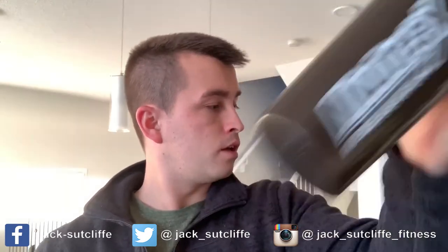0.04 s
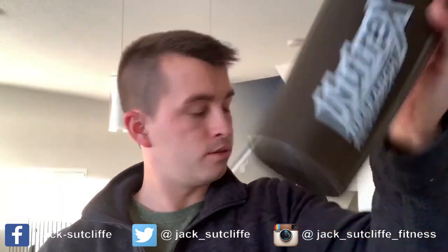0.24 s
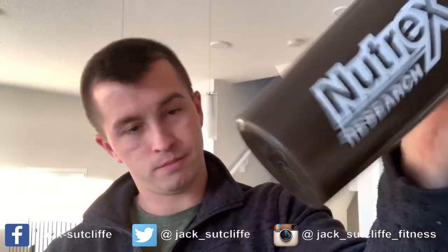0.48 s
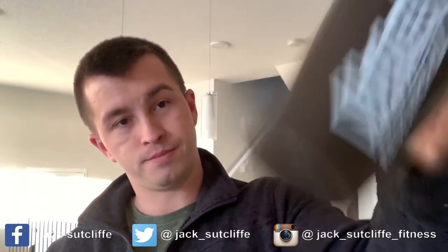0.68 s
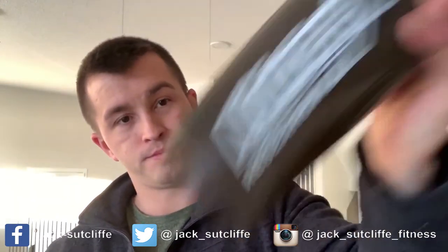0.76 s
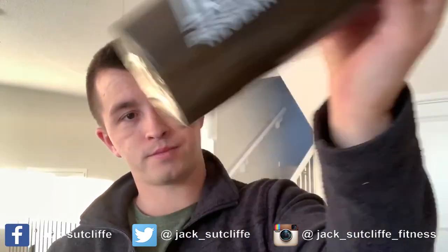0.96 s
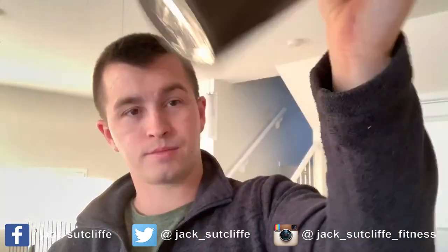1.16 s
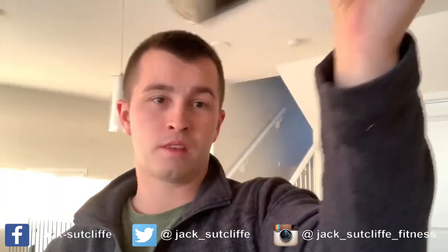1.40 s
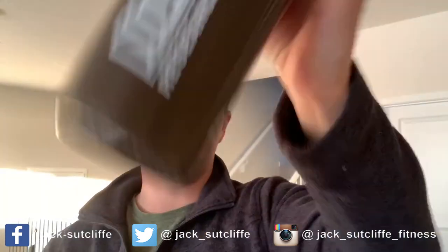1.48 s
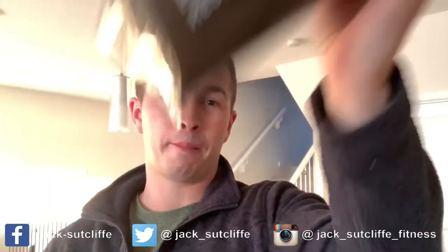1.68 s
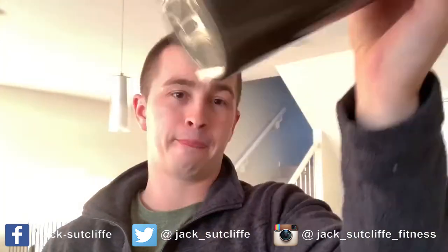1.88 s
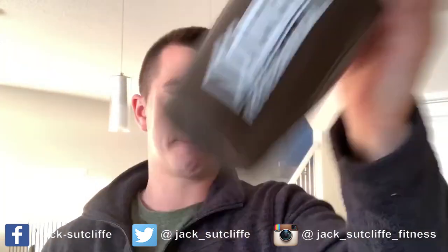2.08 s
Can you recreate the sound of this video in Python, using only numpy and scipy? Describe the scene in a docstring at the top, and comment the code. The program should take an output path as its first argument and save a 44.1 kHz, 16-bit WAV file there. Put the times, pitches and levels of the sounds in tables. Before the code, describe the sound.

A plastic shaker bottle of thick drink is shaken fast, close to the microphone in a quiet room; bubbly splashes and short falling glugs come first, then a loose part starts knocking on the plastic wall.

```python
"""A plastic shaker bottle, half full of thick drink, is shaken hard by hand, heard close by indoors in widened
stereo. From the start the drink splashes on lid and walls (clumped droplets and bubbles ringing in bands) over
quiet room noise. Soon it slaps the bottom with a falling glug (a gliding, foamy tone), and low thuds follow as
it lands (a short low sine). Later a loose part begins to knock on the plastic (ringing modes and a noise
crack); all go on almost to the end."""
import sys
import numpy as np
from scipy import signal
from scipy.fft import rfft, irfft, next_fast_len
from scipy.io import wavfile
from scipy.ndimage import uniform_filter1d

SR = 44100
rng = np.random.default_rng(int(sys.argv[2]) if len(sys.argv) > 2 else 0)


def invert_db(level):
    """Linear amplitude ratio for a level in decibels (20 dB per decade), elementwise."""
    return 10 ** (np.asarray(level, dtype=float) / 20)


def int16_out(signal):
    """Quantize to a 16-bit WAV file."""
    q = np.round(np.clip(np.atleast_2d(signal).T, -1, 1) * 32767)
    wavfile.write(sys.argv[1], SR, q.astype(np.int16))


N = 94770

# Levels in the tables are relative mix settings.
# Room noise colour: f/Hz, level/dB
ROOM_COLOUR = [(70, 2.5), (160, -13.5), (1000, -9.5), (15000, -32)]
ROOM_DB = -51.5

# Low thuds as the drink lands on the bottom: t/s, level/dB
THUDS = [(0.137, -41), (0.349, -38.5), (0.459, -47), (0.574, -43), (0.79, -36), (1.032, -41), (1.065, -41),
         (1.238, -41), (1.386, -47), (1.468, -40.5), (1.688, -46.5), (1.958, -42)]
THUD_HZ, THUD_RISE_S = 70.5, 0.0084

# Knocks of the loose part: t/s, level/dB, treble crack against it/dB
KNOCKS = [(0.608, -28.5, -27), (0.776, -26, -20), (0.998, -25.5, -19), (1.035, -28, -31),
          (1.349, -29.5, -25), (1.523, -49, 14.5), (1.667, -31.5, -8), (1.932, -25.5, -11)]
# Modes of the plastic wall: f/Hz, level/dB, time to fall 60 dB/s
WALL_MODES = [(693, -1.5, 0.017), (1086, -2, 0.018), (1880, 1.5, 0.0051), (3200, -2.5, 0.0068)]
CRACK_HZ, CRACK_T60_S = 6000, 0.018

# Slaps on the bottom: t/s, level/dB, length/s, pitch fall/(octaves per s)
SLAPS = [(0.113, -32, 0.029, 48.7), (0.334, -38.5, 0.033, 55), (0.563, -34, 0.032, 58.7),
         (0.78, -41.5, 0.061, 33.7), (1.028, -36.5, 0.018, 83), (1.249, -43.5, 0.038, 53),
         (1.45, -35.5, 0.055, 24), (1.728, -42.5, 0.037, 54), (1.944, -35.5, 0.046, 58.7)]
SLAP_ABOVE_HZ, SLAP_END_HZ = 617.8, 107.2  # the tone starts this far above the pitch it falls towards
SLAP_RISE_SHARE = 0.28  # part of the length until the swell peaks
SLAP_WAVER_OCTAVES, SLAP_FOAM_DB = 0.27, 5.5

# Splashes: t/s, level/dB, 1 kHz side against it/dB, 12 kHz side against it/dB, hold/s, air pocket f/Hz
SPLASHES = [(0.0004, -30, -2.5, -19, 0.0083, 2420), (0.0653, -32.5, -10, -23, 0.053, 1300),
            (0.17, -43, -53, -8.5, 0.03, 2750), (0.1913, -39.5, -20, -2.5, 0.011, 2320),
            (0.203, -28.5, -11, -54, 0.035, 3200), (0.243, -42, 3, -9.5, 0.019, 2800),
            (0.298, -34, -1.5, -20, 0.019, 1500), (0.322, -35.5, 5, -25, 0.015, 1300),
            (0.4037, -47, -42, -3.5, 0.024, 2330), (0.418, -36, -18, -8.5, 0.0087, 2610),
            (0.447, -33, -0.5, -19, 0.041, 2480), (0.545, -31.5, -6.5, -29, 0.02, 1340),
            (0.563, -36.5, 11.5, -26, 0.0064, 1200), (0.607, -32, -4.5, -38, 0.009, 3000),
            (0.6627, -27, -11, -20, 0.0071, 2370), (0.695, -35.5, -1, -25, 0.035, 2290),
            (0.758, -33, -3, -22, 0.057, 1570), (0.881, -33, -2.5, -16, 0.054, 2450),
            (0.96, -35.5, -4.5, -21, 0.061, 1040), (1.023, -34.5, 3, -25, 0.029, 1380),
            (1.119, -35, -5, -17.5, 0.06, 1170), (1.218, -35, -5, -22.5, 0.045, 1450),
            (1.341, -32.5, -8, -10.5, 0.0058, 1950), (1.352, -34.5, -0.5, -21, 0.046, 1990),
            (1.4464, -35, 1.5, -18.5, 0.036, 990), (1.566, -32.5, -7, -18, 0.029, 2290),
            (1.6165, -36, 3.5, -14, 0.0067, 1800), (1.659, -36.5, -5.5, -19, 0.073, 1200),
            (1.74, -39.5, -0.5, -22, 0.021, 1300), (1.814, -30, -5.5, -17.5, 0.017, 2420),
            (1.841, -30, -3.5, -64, 0.017, 1160), (1.926, -31.5, -5, -22, 0.034, 1280),
            (2.053, -32.5, -23, -19, 0.041, 2240), (2.071, -34, 1, -22.5, 0.034, 1540),
            (2.129, -33.5, -35, -17.5, 0.014, 3700)]
# Where the low, middle and high level settings of a splash apply: f/Hz
SPLASH_KNOTS_HZ = [900, 2300, 12000]
# Colour common to all splashes: f/Hz, level/dB
SPLASH_COLOUR = [(200, -22.5), (500, -5), (2300, -7), (3500, 3), (5500, 6), (8000, 13), (15500, 8.5)]
# Fade after the hold: f/Hz, fade/(dB per s)
SPLASH_FADE = [(1000, 492), (3000, 121), (12000, 237)]
# Hushes of the sloshing while the drink is in flight: start t/s, end t/s, level/dB
HUSHES = [(0.387, 0.403, -6), (0.622, 0.659, -16), (1.32, 1.345, -15), (1.518, 1.563, -4.5),
          (1.999, 2.046, -8)]
SPLASH_ATTACK_S, SWELL_SHARE = 0.0023, 0.16  # the rise lasts the attack plus this share of the hold
STAGGER_S = 0.004  # latest extra delay of a band
POCKET_DB, POCKET_OCTAVES, POCKET_FALL_PER_S = 10, 0.24, 5  # peak height, width, octaves fallen per s
DROPS_PER_S, DROP_CYCLES = 2000, 8.5  # rate per band at 4 kHz; cycles to fall 60 dB
DROP_SPREAD_DB, CLUMP_DB, PATCH_DB = 1.6, 2, 2.6  # from drop to drop, over all bands, within one band
BUBBLES_PER_S, BUBBLE_CYCLES = 70, 30  # rate per resonance; cycles for each of its two stages to fall 60 dB
BUBBLE_DB, BUBBLE_TOP_HZ = 2, 4800  # level against the drops in the bass; where it is halved

# Phase between the channels, left ahead of right: f/Hz, phase/rad
PHASE_APART = [(0, 0), (700, 1.4), (1400, 0), (2400, 1), (4500, -1.5), (7700, -3.05), (9100, -3.25),
               (11700, -6.15), (13500, -6.45), (15700, -9.4)]
# Likeness of the left and right channels: f/Hz, likeness (1 = same sound)
SHARED = [(50, .8), (600, .5), (1450, .75), (3200, .15), (5500, .2), (8100, .995), (10500, .88),
          (12500, .997), (15000, .75)]
# Balance, left minus right: f/Hz, level/dB
TILT = [(300, 0), (1200, 3.5), (4000, 2), (8000, 0)]
TOP_HZ = 16000


def rms_one(x):
    """Scale to rms 1."""
    return x / np.sqrt(np.mean(x ** 2) + 1e-20)


def at_hz(points, hz):
    """Read a table on a log-frequency axis."""
    table_hz, value = np.transpose(points)
    return np.interp(np.log(hz), np.log(table_hz), value)


def drift(rate):
    """Random wander of rms 1: noise smoothed by two equal low-passes at a rate in Hz."""
    every = 20  # samples between points of the curve
    pole = np.exp(-2 * np.pi * rate * every / SR)
    noise = rng.standard_normal(N // every + 502)
    slow = signal.lfilter([1], [1, -2 * pole, pole * pole], noise)[500:]
    return np.interp(np.arange(N) / every, np.arange(len(slow)), rms_one(slow))


def ring(clicks, hz, t60):
    """A unit click sets off a decaying sine that starts from height 1."""
    pole, turn = invert_db(-60 / (t60 * SR)), 2 * np.pi * hz / SR
    return signal.lfilter([0, np.sin(turn)], [1, -2 * pole * np.cos(turn), pole * pole], clicks + 1e-18)


def add(out, s, sound):
    """Mix a sound in at a time in seconds."""
    i = int(max(s, 0) * SR)
    out[i:i + len(sound)] += sound[:N - i]


def room_tone():
    """Steady quiet noise of the room, coloured by its table and thinned out below 45 Hz."""
    hz = np.arange(N // 2 + 1) * SR / N + 1
    colour = invert_db(at_hz(ROOM_COLOUR, hz)) * hz ** 4 / (hz ** 4 + 45 ** 4)
    noise = irfft(rfft(rng.standard_normal(N)) * colour, N)
    return invert_db(ROOM_DB) * rms_one(noise)


def thuds():
    """Each landing of the drink on the bottom gives a soft low swing of a cycle or two."""
    out, t = np.zeros(N), np.arange(SR // 8) / SR
    x = t / THUD_RISE_S
    swing = x * np.exp(1 - x) * np.sin(2 * np.pi * THUD_HZ * t)
    for s, db in THUDS:
        add(out, s, invert_db(db) * swing)
    return out


def knocks():
    """Each knock rings the wall's short modes, unevenly excited, and cracks as a burst of treble noise."""
    s, db, crack_db = np.transpose(KNOCKS)
    out, at = np.zeros(N), (s * SR).astype(int)
    for hz, level_db, t60 in WALL_MODES:
        clicks = np.zeros(N)
        uneven_db = rng.normal(0, 4.43, len(s))
        clicks[at] = invert_db(db + level_db - 6 + uneven_db) * rng.choice([-1, 1], len(s))
        out += ring(clicks, hz, t60)
    clicks = np.zeros(N)
    clicks[at] = invert_db(db + crack_db)
    decay = signal.lfilter([1], [1, -invert_db(-60 / (CRACK_T60_S * SR))], clicks + 1e-18)
    high_pass = signal.butter(2, CRACK_HZ, "high", fs=SR, output="sos")
    return out + signal.sosfilt(high_pass, decay * rng.standard_normal(N))


def slaps():
    """The air pocket under the landing drink sounds a wavering tone that falls fast, roughened by foam."""
    out, waver = np.zeros(N), drift(105.7)
    foam = rms_one(signal.lfilter([1], [1, -.97], rng.standard_normal(N)))
    for s, db, length, fall in SLAPS:
        t = np.arange(int(3 * length * SR)) / SR
        i = int(s * SR)
        part = slice(i, i + len(t))
        pitch = SLAP_END_HZ + SLAP_ABOVE_HZ * 2 ** (-fall * t)
        pitch = pitch * 2 ** (SLAP_WAVER_OCTAVES * waver[part])
        tone = np.sin(2 * np.pi * np.cumsum(pitch) / SR)
        foamy = tone * (1 + invert_db(SLAP_FOAM_DB) * np.tanh(foam[part]))
        x = t / (SLAP_RISE_SHARE * length)
        add(out, s, invert_db(db) * x * np.exp(1 - x) * foamy)
    return out


def bubble(clicks, hz):
    """A click rings the same resonance twice over: it swells softly and stays narrow."""
    return ring(ring(clicks, hz, BUBBLE_CYCLES / hz), hz, BUBBLE_CYCLES / hz)


def splashes():
    """Clumped droplets ring briefly, bubbles longer; every splash rises, holds and fades in each band."""
    step = np.arange(0, N / SR + .001, .001)  # envelope times in s
    s, db, low_db, high_db, hold, pocket_hz = np.transpose(SPLASHES)[:, :, None]
    age, clump, out = step - s, drift(57), 0
    hush = invert_db(sum(depth_db * (step > start) * (step < end) for start, end, depth_db in HUSHES))
    hush = uniform_filter1d(hush, size=5)
    for hz in np.geomspace(200, 15500, num=28):
        delay = STAGGER_S * rng.random(s.shape) ** 2
        rise = np.clip((age - delay) / (SPLASH_ATTACK_S + SWELL_SHARE * hold), 0, 1) ** 2
        side = np.interp(np.log(hz), np.log(SPLASH_KNOTS_HZ), [-1, 0, 1])  # -1 low, 1 high
        peak_db = db + low_db * max(-side, 0) + high_db * max(side, 0) + at_hz(SPLASH_COLOUR, hz)
        # the falling pitch of the air pocket lifts the bands it passes
        off = (np.log2(hz / pocket_hz) + POCKET_FALL_PER_S * np.maximum(age, 0)) / POCKET_OCTAVES
        peak_db = peak_db + POCKET_DB * np.exp(-.5 * off ** 2)
        fade_db = at_hz(SPLASH_FADE, hz) * np.maximum(age - hold, 0)
        power = rise * invert_db(2 * (peak_db - fade_db))
        level = np.interp(np.arange(N) / SR, step, hush * np.sqrt(power.sum(axis=0)))

        drops = (rng.random(N) < DROPS_PER_S * np.sqrt(hz / 4000) / SR) * rng.standard_normal(N)
        spread_db = DROP_SPREAD_DB * np.minimum(rng.exponential(1, N), 4)
        drops *= invert_db(spread_db + CLUMP_DB * clump + PATCH_DB * drift(40))
        unit = 1 / np.sqrt(np.mean(ring(drops, hz, DROP_CYCLES / hz) ** 2))
        out = out + ring(drops * level * unit, hz, DROP_CYCLES / hz)

        for near_hz in hz * 2 ** np.array([-1 / 18, 1 / 18]):
            born = (rng.random(N) < BUBBLES_PER_S / SR) * rng.standard_normal(N)
            unit = invert_db(BUBBLE_DB) / np.sqrt(2 * np.mean(bubble(born, near_hz) ** 2))
            unit = unit / (1 + (hz / BUBBLE_TOP_HZ) ** 2)  # weaker in the treble
            out = out + bubble(born * level * unit, near_hz)
    return out / 8.5


def widen(common, apart):
    """Left and right share a common sound, turned apart in phase, plus a part that differs between them."""
    size = next_fast_len(N + 2048)
    hz = np.arange(size // 2 + 1) * SR / size + 1
    shared, sign = at_hz(SHARED, hz), np.array([[.5], [-.5]])  # left, right
    same = np.sqrt((1 + shared) / 2) * rfft(common, size)
    differing = 2 * sign * np.sqrt((1 - shared) / 2) * rfft(apart, size)
    phase = np.exp(1j * sign * np.interp(hz, *np.transpose(PHASE_APART)))
    balance = invert_db(sign * at_hz(TILT, hz))
    return irfft((same + differing) * phase * balance, size)[:, :N]


def scene():
    """Liquid and room tone are drawn twice to widen the stereo; the solid sounds shift between left and right."""
    solid = thuds() + knocks()
    common = room_tone() + slaps() + splashes() + solid
    apart = room_tone() + slaps() + splashes() + solid * drift(0.99)
    return widen(common, apart)


def top_cut(x):
    """Nothing passes above the cut-off."""
    return signal.sosfilt(signal.butter(12, 15770, fs=SR, output="sos"), x)


def record(dry):
    """A steep low-pass takes off the extreme top of the mix."""
    low_pass = signal.cheby2(14, 60, TOP_HZ, fs=SR, output="sos")
    mix = signal.sosfilt(low_pass, dry)
    return top_cut(mix)


dry = scene()
out = record(dry)
int16_out(out)
```